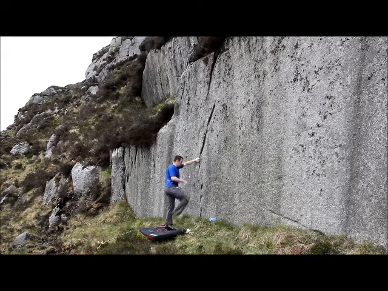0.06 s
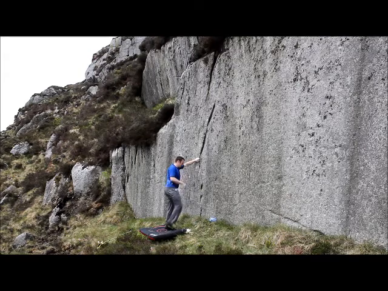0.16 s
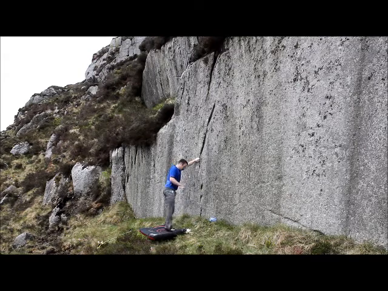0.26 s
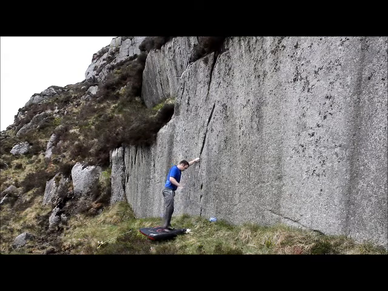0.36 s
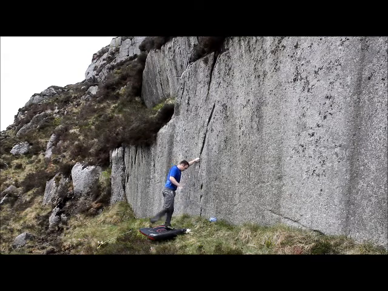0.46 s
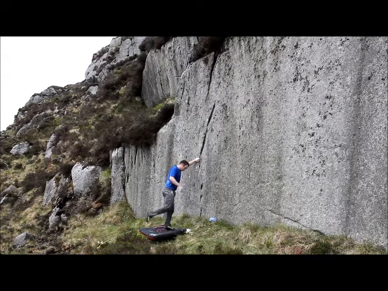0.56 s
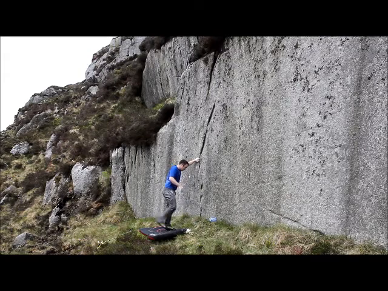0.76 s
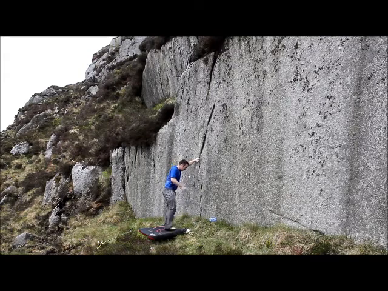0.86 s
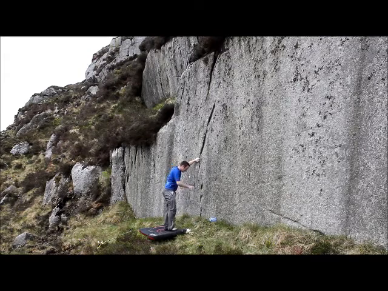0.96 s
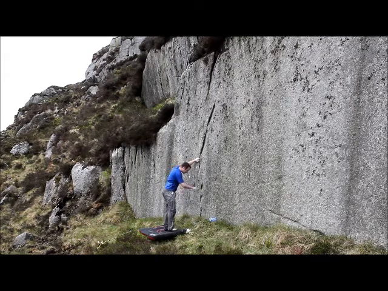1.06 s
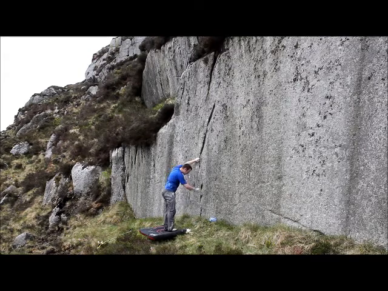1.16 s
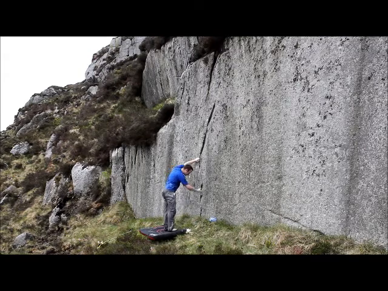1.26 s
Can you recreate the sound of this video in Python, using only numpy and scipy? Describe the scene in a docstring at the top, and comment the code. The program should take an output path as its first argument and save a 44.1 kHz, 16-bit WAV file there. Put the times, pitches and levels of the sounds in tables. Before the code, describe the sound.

A foot thumps dully on a foam mat at about 0.25 seconds. A shoe then scrapes over grit with a slight rubber squeak, ending in a second thump at 0.5 seconds. A softer third step scuffs briefly just before 1 second, followed by faint taps and grit ticks around 1.2 seconds, with a very faint thin whistle. The rock gives a short echo over steady, quiet outdoor hiss.

```python
"""A climber's feet land on a foam mat at the foot of a rock wall: three dull footfalls, each a thump
and a low rumble as the mat settles. One shoe is wiped over grit in a scrape that half squeaks as its
rubber sticks and slips. The last step scuffs briefly, and faint taps and ticks of grit follow.
The rock throws back a short echo; behind it all are a quiet outdoor hiss and one faint whistle."""
import sys
import numpy as np
from scipy import signal
from scipy.fft import rfft, irfft
from scipy.io import wavfile

SR = 44100
rng = np.random.default_rng(int(sys.argv[2]) if len(sys.argv) > 2 else 0)


def master_out(mix):
    """Clip the mix to full scale and print it as 16-bit PCM to the path in sys.argv[1]."""
    frames = np.transpose(np.atleast_2d(mix))
    ceiling = np.clip(frames, -1, 1)
    pcm = np.round(ceiling * 32767).astype(np.int16)
    wavfile.write(sys.argv[1], SR, pcm)


N = 57330
T = np.arange(N) / SR

# tone of the mat's low rumble, also used for rubbing and rustling (frequency [Hz], level [dB])
RUMBLE_SPECTRUM = [(25, -16), (65, -18), (140, -0.5), (210, 0.5), (330, -2.5), (450, -0.5), (650, -12.5),
                   (1500, -23), (5000, -60)]


def footfalls():
    """Each step makes the mat ring in a few quickly dying tones; it then settles with a low rumble."""
    # steps and soft taps (start [s], level [dB], pitch [factor], contact time [s],
    # boost of the deep tones [dB], rumble level [dB])
    landings = [(0.2385, -22, 1.07, 0.0013, -2, -42), (.254, -37, 1.05, 0.003, 2, -83),
                (0.277, -32.5, 0.81, 0.0053, 3, -77), (.4803, -23.5, 1.0, .0006, -5, -52),
                (0.516, -47, 0.99, 0.0018, 14, -64), (0.9357, -30, 1.04, 0.00036, -2, -48),
                (0.9608, -38, 0.86, 0.00064, 3, -49.5), (0.999, -37, 1.2, 0.0017, -18, -71),
                (1.017, -41, 0.87, 0.0019, -8, -56.5), (1.227, -35.5, 1.19, 0.0033, -17, -72)]
    # tones of the mat under a shoe (frequency [Hz], level [dB], time to fade by 60 dB [s])
    mat_tones = [(83, -26, 0.1), (135, -14, 0.069), (333.3, 1, 0.017), (399, -9.5, 0.03),
                 (574, -23.5, 0.029), (1247, -10.5, 0.013)]
    deep_below_hz = 200
    out = np.zeros(N)
    for start, db, pitch, contact_s, boost_db, rumble_db in landings:
        age = np.maximum(T - start, 0)
        thump = np.zeros(N)
        for hz, tone_db, fade_s in mat_tones:
            fading_db = tone_db + boost_db * (hz < deep_below_hz) - 60 * age / fade_s
            thump += amp(fading_db) * np.sin(2 * np.pi * hz * pitch * age)
        press = 1 - np.exp(-age / contact_s)
        out += amp(db) * thump * press
        settling = burst(start, rise_s=0.0076, fade_s=0.2)
        out += amp(rumble_db) * settling * colour(noise(), RUMBLE_SPECTRUM)
    return out


def friction(slips_per_s=7000, spread_db=2.5, smooth_share=0.33):
    """A sliding sole makes many tiny slips of uneven size over a smooth rub."""
    sizes = amp(spread_db * np.minimum(rng.exponential(1, N), 4)) * np.sign(noise())
    slips = unit(sizes * (rng.random(N) < slips_per_s / SR))
    return np.sqrt(1 - smooth_share) * slips + np.sqrt(smooth_share) * noise()


def shoe_wipe():
    """The sole drags over grit: a rasp, a fine fizz and low rubbing."""
    # loudness along the wipe (time [s], rasp [dB], fizz [dB], rubbing [dB])
    wipe_levels = [(0.308, -68, -58, -73), (.338, -62, -65, -51.5), (0.352, -50, -56, -46),
                   (0.386, -38, -43.5, -49.5), (0.41, -32.5, -36, -69), (0.432, -32.5, -37.5, -48),
                   (0.459, -38.5, -38.5, -53.5), (0.483, -38, -41.5, -42), (0.499, -44, -34.5, -50.5),
                   (0.508, -50, -55, -49), (0.529, -70.5, -57.5, -57.5), (0.571, -75, -80, -66.5)]
    # tone of the coarse rasp (frequency [Hz], level [dB])
    rasp = [(200, -17), (700, -11.5), (1100, -4.5), (1600, 0.5), (2600, 1), (3700, -3), (4800, -3),
            (7000, -8.5), (16000, -11.5)]
    # tone of the fine fizz (frequency [Hz], level [dB])
    fizz = [(1000, -30), (4000, -2), (6500, 0.5), (8500, -2), (11000, 3.5), (14000, 1), (16000, -3)]
    times, *levels = np.transpose(wipe_levels)
    out = np.zeros(N)
    for db, spectrum in zip(levels, (rasp, fizz, RUMBLE_SPECTRUM)):
        loudness = amp(np.interp(T, times, db, left=-120, right=-120))
        out += loudness * colour(friction(), spectrum)
    return out


def rubber_squeaks(pitch_wobble=0.0338, flutter=0.54, flutter_hz=175):
    """Rubber sticks and slips unsteadily: rough rising tones, each with two overtones."""
    # squeaks (start [s], length [s], first pitch [Hz], last pitch [Hz], level [dB], overtones [dB])
    squeaks = [(0.389, 0.043, 1980, 2108, -33, -34), (0.419, 0.037, 1391, 1482, -37, -3.5),
               (0.447, 0.0282, 1450, 1676, -46.5, 7.5)]
    out = np.zeros(N)
    for start, length, first_hz, last_hz, db, overtone_db in squeaks:
        glide_hz = np.interp(T, [start, start + length], [first_hz, last_hz])
        hz = glide_hz * (1 + pitch_wobble * wander(2 * flutter_hz))
        phase = 2 * np.pi * np.cumsum(hz) / SR
        for harmonic, gain in enumerate(amp([0, overtone_db, overtone_db]), start=1):
            tone = gain * np.sin(harmonic * phase) * (1 + flutter * wander(flutter_hz))
            out += amp(db) * arch(start, length) * tone
    return out


def scuffs_and_clicks():
    """Short gritty scuffs of the sole, with a dull crack and a pebble's dull click."""
    # scuffs, crack and click (start [s], time before fading [s], level [dB], treble cut-off [Hz])
    contacts = [(0.235, 0.0024, -41.5, 11650), (0.481, 0.0013, -32.5, 1970), (.9353, 0.024, -41.5, 15000),
                (0.9604, .003, -52, 7020), (0.969, 0.044, -58.5, 9600), (0.9865, 0.0017, -40.5, 4100)]
    # the tone they share (frequency [Hz], level [dB])
    spectrum = [(200, 2), (700, -8.5), (1500, -4), (3000, -6), (5500, -1.5), (8500, -6), (11000, -3.5),
                (16000, -6)]
    out = np.zeros(N)
    for start, hold_s, db, cutoff_hz in contacts:
        loudness = amp(db) * burst(start, rise_s=0.0027, fade_s=0.021, hold_s=hold_s)
        out += loudness * colour(friction(), spectrum, cutoff_hz)
    return out


def grit_ticks():
    """Grit snaps under the sole in a quick cluster of tiny bright ticks."""
    # snaps of grit (time [s], level [dB])
    snaps = [(1.1563, -56), (1.1599, -38), (1.1611, -33.5)]
    # tone of a snap (frequency [Hz], level [dB])
    spectrum = [(500, -8), (1500, -30), (2600, -6.5), (4500, -13), (7500, -18), (10000, 1.5), (13000, -11),
                (16000, -7)]
    loudness = sum(amp(db) * burst(start, rise_s=0.00026, fade_s=0.0057) for start, db in snaps)
    return loudness * colour(noise(), spectrum)


def wall_echo(sound, echo_db=-16.5, echoes_per_s=2000):
    """The rock throws the sound back as many short, scattered echoes."""
    echoes = noise() * (rng.random(N) < echoes_per_s / SR)
    echoes *= burst(0.0028, rise_s=0.0012, fade_s=0.084)
    return amp(echo_db) * signal.fftconvolve(sound, echoes / np.linalg.norm(echoes))[:N]


def weight_shift():
    """The climber shifts his weight with a faint low rustle."""
    # the rustle (start [s], length [s], level [dB])
    rustle = (0.98, 0.44, -66.5)
    start, length, db = rustle
    return amp(db) * arch(start, length) * colour(noise(), RUMBLE_SPECTRUM)


def far_whistle(pitch_wobble=0.0061):
    """A faint thin whistle, perhaps a far bird."""
    # the whistled note (start [s], length [s], pitch [Hz], level [dB])
    note = (1.155, .105, 4570, -63)
    start, length, hz, db = note
    wavering_hz = hz * (1 + pitch_wobble * wander(up_to_hz=80))
    return amp(db) * arch(start, length) * np.sin(2 * np.pi * np.cumsum(wavering_hz) / SR)


def air_hiss(level_db=-58.5):
    """The steady hiss of the open air."""
    # tone of the hiss (frequency [Hz], level [dB])
    spectrum = [(25, -12), (60, -5.5), (140, -3), (280, -1), (500, -3), (900, -3.5), (1600, -3.5),
                (4000, -6.5), (9000, -10.5), (15800, -14.5)]
    return amp(level_db) * colour(noise(), spectrum)


def amp(db):
    """Turns decibels into a factor to multiply by."""
    return 10 ** (np.asarray(db) / 20)


def unit(x):
    """Scales x to an average strength (rms) of 1."""
    return x / np.sqrt(np.mean(x ** 2) + 1e-20)


def colour(x, spectrum, cutoff_hz=1e6):
    """Gives x the tone of a spectrum table, dulled above the cut-off, at strength 1."""
    hz = np.fft.rfftfreq(N, 1 / SR)
    table_hz, db = np.transpose(spectrum)
    gain = amp(np.interp(np.log(hz + 1), np.log(table_hz), db))
    gain /= np.sqrt(1 + (hz / cutoff_hz) ** 8)
    gain *= np.minimum(hz / 25, 1)  # fades out below 25 Hz
    return unit(irfft(rfft(x) * gain, N))


def noise():
    """White noise."""
    return rng.standard_normal(N)


def burst(start, rise_s, fade_s, hold_s=0):
    """A loudness curve that rises and, from hold_s after its start, drops 60 dB every fade_s."""
    fading_s = np.maximum(T - start - hold_s, 0)
    return np.clip((T - start) / rise_s, 0, 1) * amp(-60 * fading_s / fade_s)


def arch(start, length):
    """A loudness curve that swells and fades."""
    return np.sin(np.pi * np.clip((T - start) / length, 0, 1))


def wander(up_to_hz):
    """A smooth random wobble of strength 1."""
    hz = np.fft.rfftfreq(N, 1 / SR)
    return unit(irfft(rfft(noise()) / (1 + (hz / up_to_hz) ** 4), N))


def scene():
    """The feet, their echo and the quiet background, in one channel."""
    feet = footfalls() + shoe_wipe() + scuffs_and_clicks() + grit_ticks() + rubber_squeaks()
    return (feet + wall_echo(feet) + far_whistle() + weight_shift() + air_hiss())[None]


def record(dry):
    """Trims away the deepest bass and the highest treble."""
    low_cut_hz, high_cut_hz = 69.5, 15950
    bass_filter = signal.butter(2, low_cut_hz, "highpass", fs=SR, output="sos")
    treble_filter = signal.firwin(511, high_cut_hz, window=("kaiser", 9), fs=SR)
    return signal.oaconvolve(signal.sosfilt(bass_filter, dry), treble_filter[None], "same")


dry = scene()
out = record(dry)
master_out(out)
```